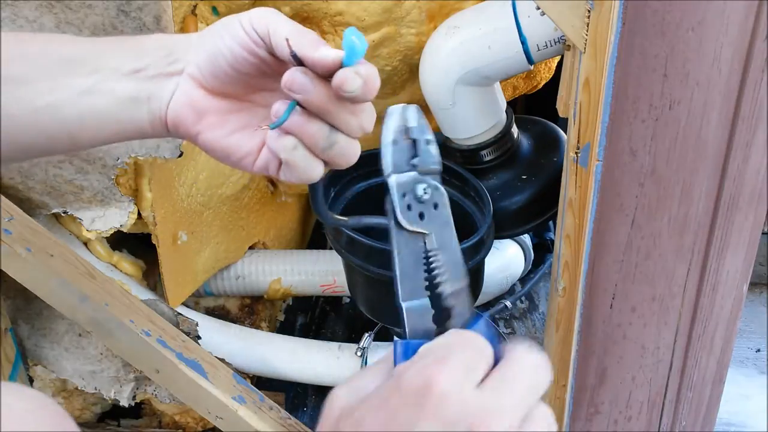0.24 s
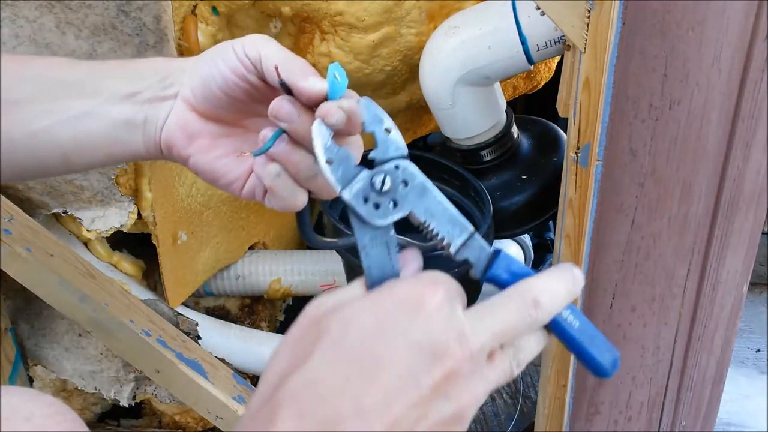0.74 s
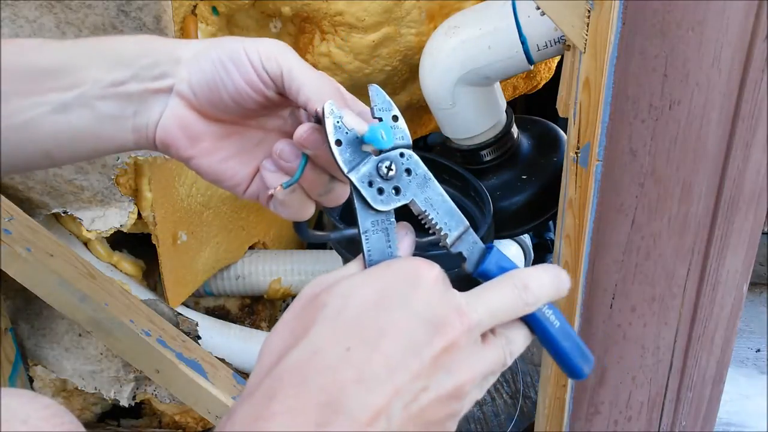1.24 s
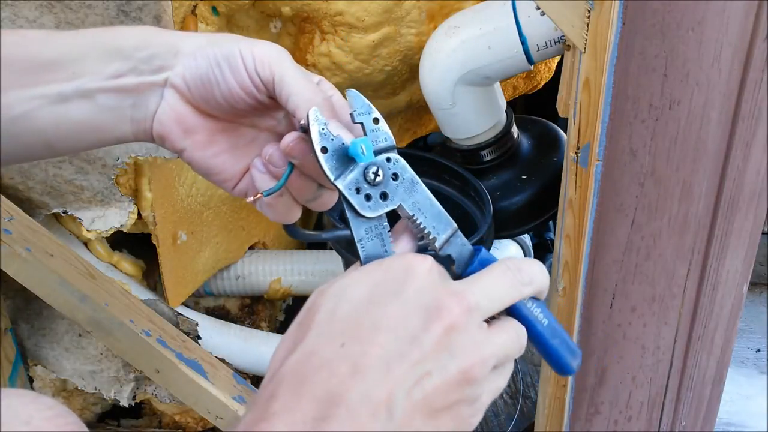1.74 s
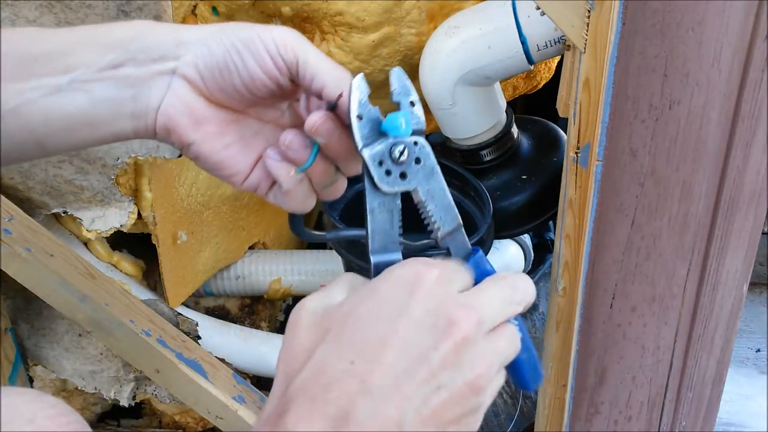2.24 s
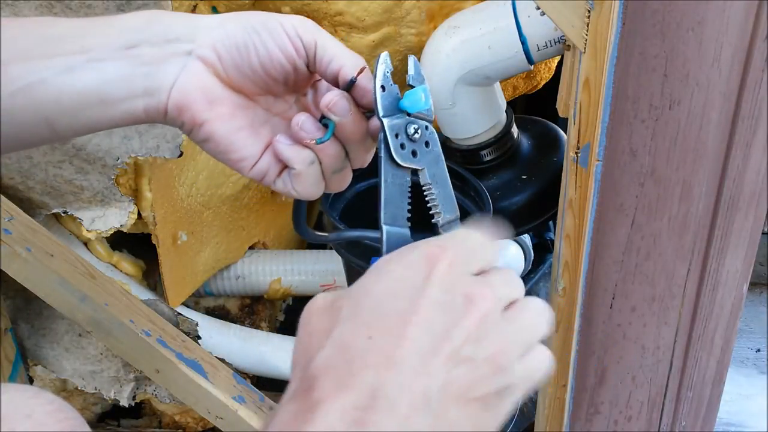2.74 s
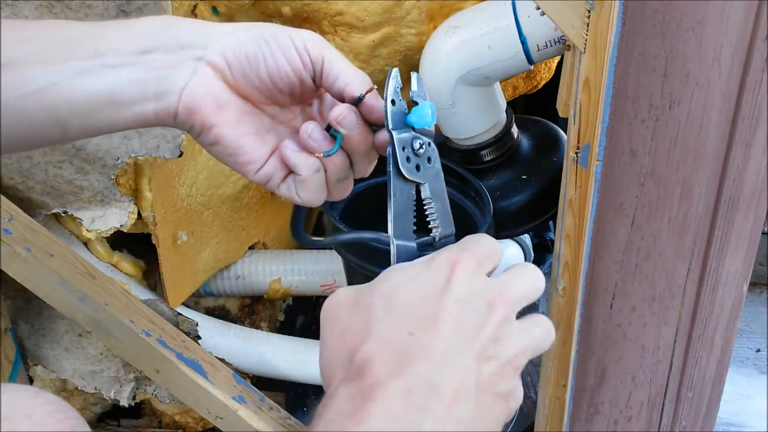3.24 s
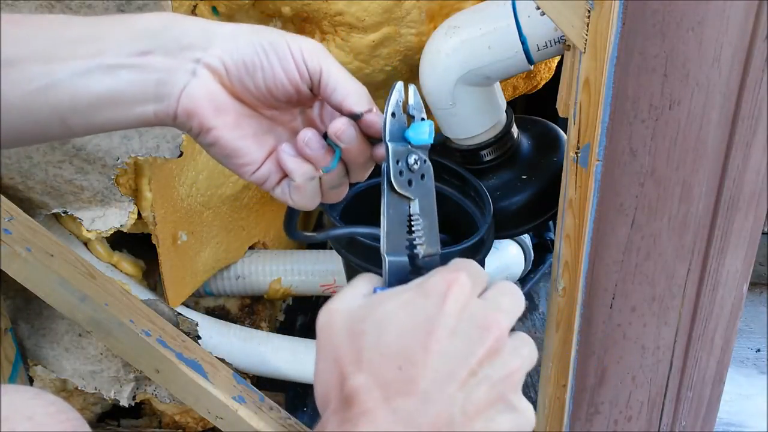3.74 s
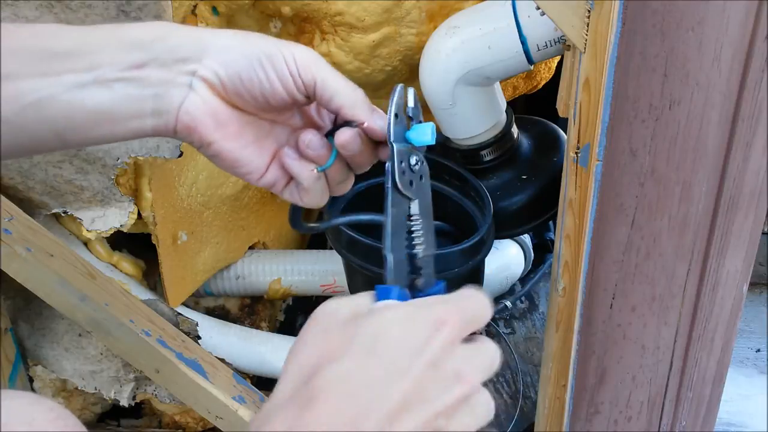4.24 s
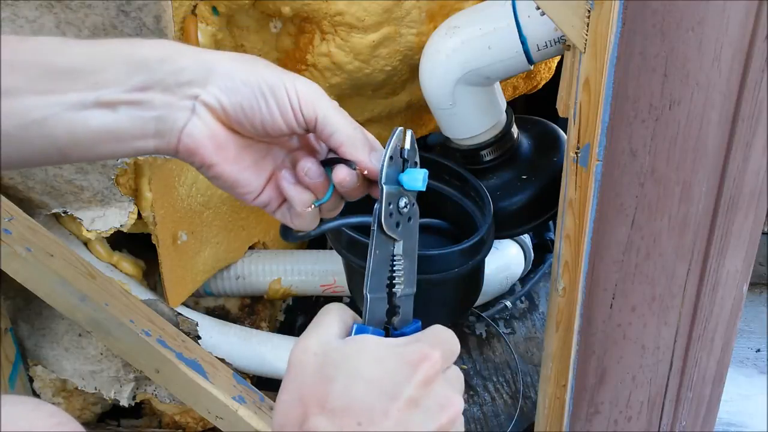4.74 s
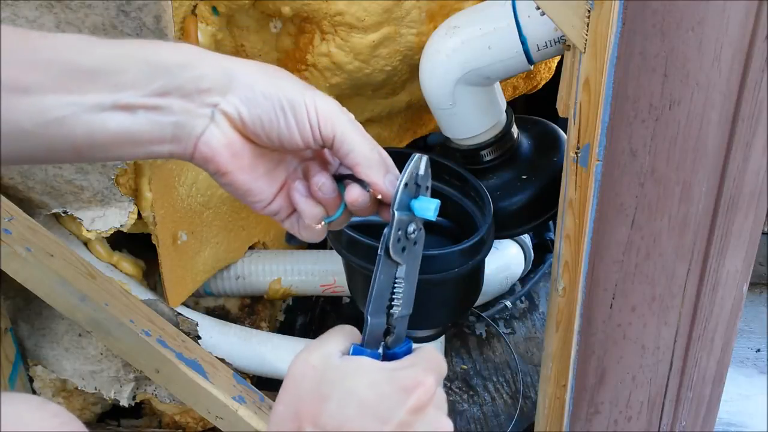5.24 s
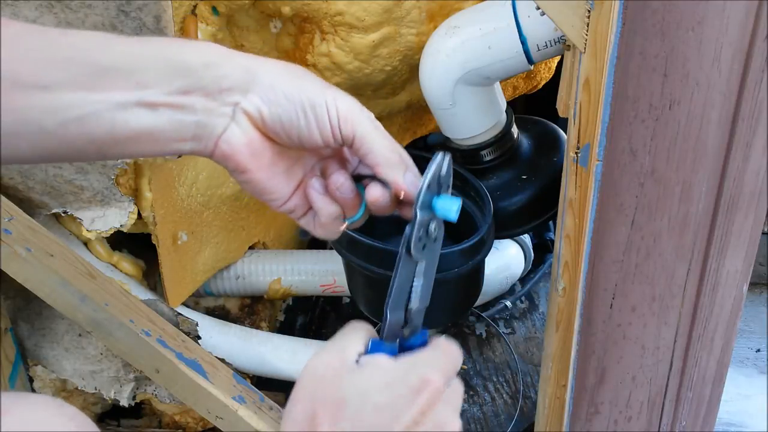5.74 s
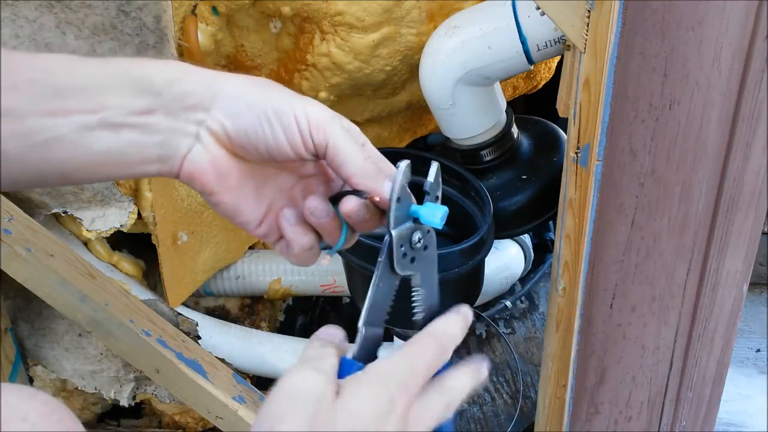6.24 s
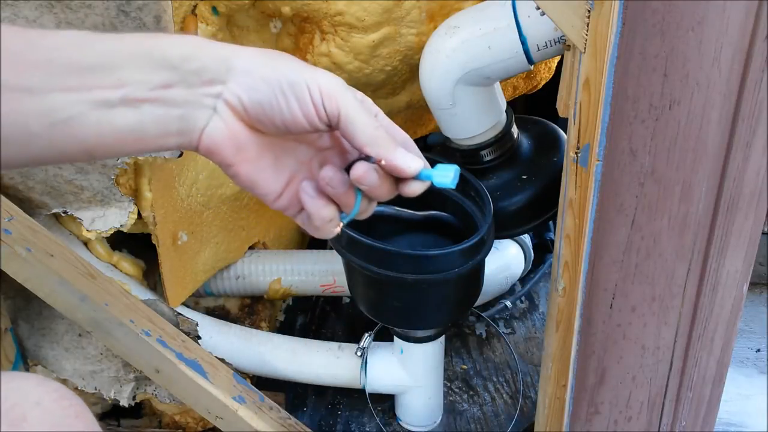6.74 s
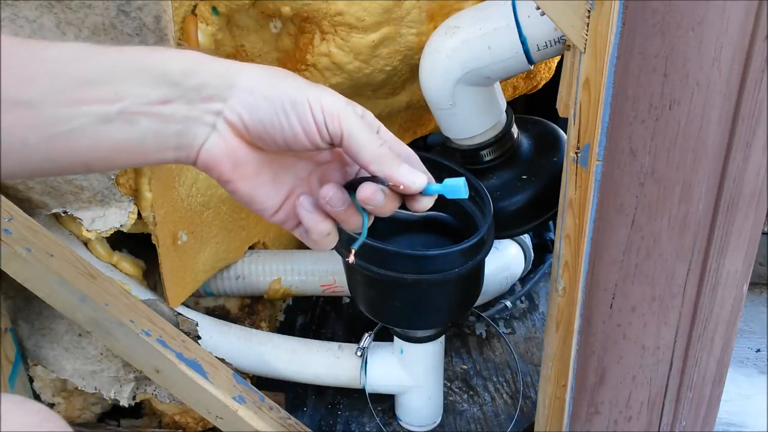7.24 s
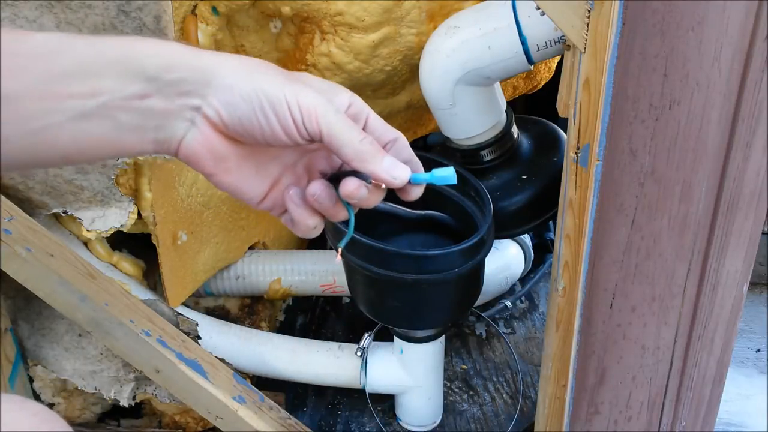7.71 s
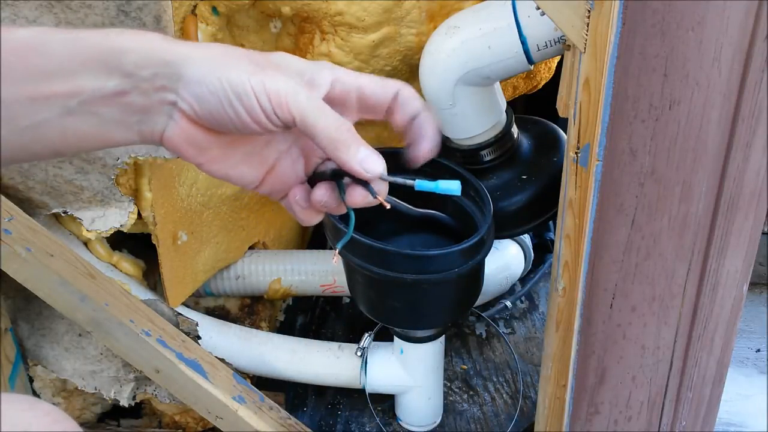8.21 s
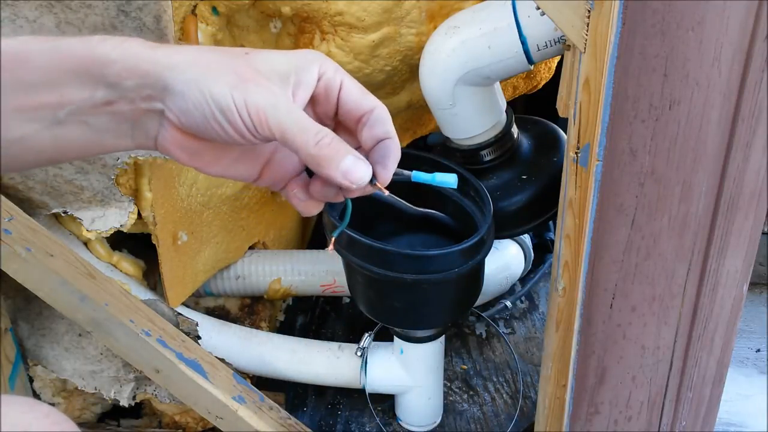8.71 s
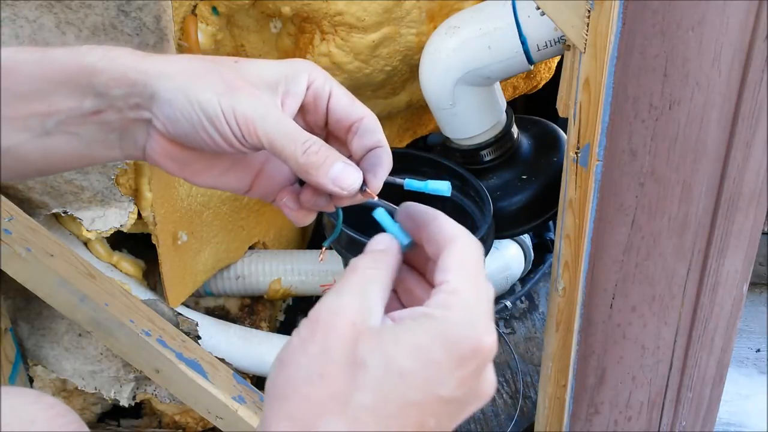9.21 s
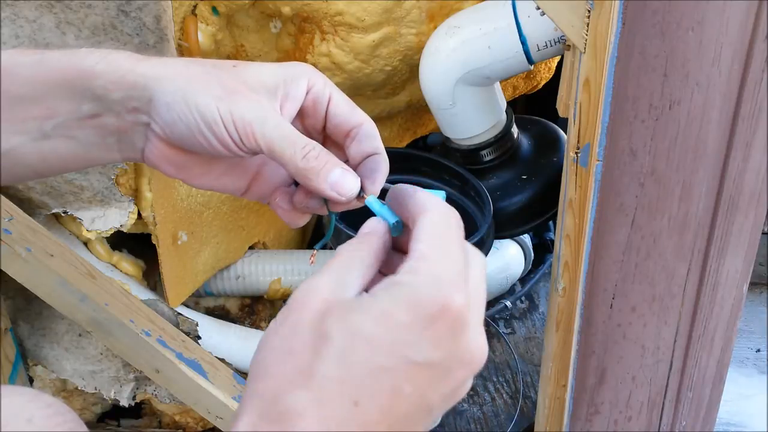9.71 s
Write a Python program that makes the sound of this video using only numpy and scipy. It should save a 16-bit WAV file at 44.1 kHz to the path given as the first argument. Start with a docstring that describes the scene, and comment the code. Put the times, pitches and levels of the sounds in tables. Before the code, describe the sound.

Dry, crisp metal ticks and soft finger rubs sit close to the microphone, while an idling engine rumbles unevenly some way off, strongest early and fading later. A short bird whistle comes just before a connector's clean plastic snap. After a pause the tool's jaws spring open loudly, a sleeve brushes, the jaws clap and the tool rattles down. Light wire slides and flicks follow.

```python
"""Outdoors, an engine idles some way off (shaft orders over rumble) with its fan humming (blade tones), under hiss.
Close by, just right of a stereo microphone, fingers and a sleeve rub (shaped noise) and steel jaws tick.
A distant bird whistles a short phrase (gliding sines), then a plastic connector gives way in the crimping tool.
The tool springs open, claps shut and is laid down with a clatter (noise bursts through resonances of the parts).
Last, fingers slide along the wire and flick it."""
import sys
import numpy as np
from scipy.fft import rfft, irfft, next_fast_len
from scipy.io import wavfile
from scipy.ndimage import map_coordinates

SR = 44100
rng = np.random.default_rng(int(sys.argv[2]) if len(sys.argv) > 2 else 0)


def wav_record(signal):
    """Record a signal, one row per channel, as 16-bit PCM in the file named by sys.argv[1]."""
    frames = np.transpose(np.atleast_2d(signal))
    bounded = np.clip(frames, -1, 1)
    # unit amplitude maps onto the largest positive 16-bit level
    quanta = np.round(bounded * 32767).astype(np.int16)
    wavfile.write(sys.argv[1], SR, quanta)


N = 439677  # length [samples]
SIDES = np.array([[.5], [-.5]])  # shares a left-right difference: positive is louder on the left
TOP_HZ = 14650  # upper band limit of the microphone

# All levels in the tables are relative.
# hiss of the place: (frequency [Hz], level [dB])
AIR_SPECTRUM = [(100, 8.5), (600, 5), (1500, 5), (3500, 3), (5500, 2), (8000, 1.5), (9600, 1), (11500, 1),
                (14500, 1)]
AIR_DB, AIR_FADE_DB_PER_S = -59, 0.71  # the hiss slowly ebbs
# likeness of distant noise at the two ports: (frequency [Hz], correlation [-1 to 1])
PORT_LIKENESS = [(60, 0.65), (130, 0.83), (250, 0.54), (500, 0.37), (1000, 0), (4000, 0)]

# speed of the idling shaft: (time [s], speed [turns/s])
SHAFT_SPEED = [(0, 20.2), (1.3, 19.9), (3, 19.3), (5, 19.1), (7.5, 19.55), (9.97, 19)]
# exhaust tones: (multiple of the shaft rate [order], level [dB])
EXHAUST_ORDERS = [(2, -28.5), (4, -13), (5, 0.5), (6, -11.5), (7, -12.5), (8, -16), (9, -29.5), (10, -32),
                  (11, -39.5), (12, -31), (13, -41), (15, -30.5), (17, -34)]
# how loudly the engine's drone carries: (time [s], level [dB])
DRONE_LEVEL = [(0, -50.5), (0.25, -44.5), (1.1, -41), (2.9, -45.5), (3.6, -55.5), (4.36, -55.5),
               (4.8, -48.5), (5.6, -57.5), (6.1, -54), (7, -50), (8.5, -57), (8.9, -56), (9.97, -60.5)]
# low boom at three times the shaft rate: (time [s], level [dB])
BOOM_LEVEL = [(0, -64), (1.6, -59), (2.9, -50.5), (3.6, -61), (4.4, -59.5), (6, -65), (9.97, -67)]
# octave of the drone: (time [s], level [dB])
OCTAVE_LEVEL = [(0, -69), (1.4, -71), (3, -77), (6.5, -75.5), (8.5, -69), (9.1, -63), (9.97, -72)]
# engine rumble: (frequency [Hz], level [dB])
RUMBLE_SPECTRUM = [(20, -16.5), (40, -4.5), (65, -6), (90, 12), (130, 7.5), (190, -0.5), (260, -1),
                   (370, -2.5), (480, -6.5), (620, -9), (760, -12.5), (1100, -14), (1600, -25), (3000, -32),
                   (8000, -47.5)]
USUAL_DRONE_DB, RUMBLE_FOLLOWS = -52, .5  # dB of rumble for each dB of drone above the usual

FAN_HZ = 74.02  # base rate of the fan tones
# how loudly the fan carries: (time [s], level [dB])
FAN_LEVEL = [(0, -64.5), (2, -57.5), (2.8, -58), (3.9, -75.5), (4.5, -71), (7.3, -70), (8.2, -86),
             (8.8, -70), (9.4, -68.5), (9.97, -74)]
# blade tones: (multiple of FAN_HZ [order], level [dB])
BLADE_ORDERS = [(4, -20.5), (5, -2.5), (6, -8), (7, 0), (8, -11), (9, -15.5), (10, -23.5), (14, -21.5)]

# whistled notes: (time [s], length [s], start [Hz], middle [Hz], end [Hz], level [dB])
BIRD_NOTES = [(2.96, .07, 2950, 3080, 3050, -78), (3.205, .095, 3080, 3120, 2880, -69),
              (3.295, .215, 4220, 4090, 3930, -70), (3.5, .08, 4350, 4370, 4200, -75),
              (3.6, .035, 4170, 4150, 4120, -76)]

# colour of nearby sounds at each microphone port: (frequency [Hz], level [dB])
LEFT_PORT = [(400.0, -27.5), (900.0, -23.5), (1600.0, -21.5), (2400.0, -21), (3700.0, -12.5),
             (5000.0, -18.5), (6300.0, -23), (7500.0, -26), (9600.0, -35), (11300.0, -33), (13000.0, -30.5),
             (14400.0, -33.5)]
RIGHT_PORT = [(400.0, -21.5), (900.0, -25.5), (1600.0, -21.5), (2400.0, -25), (3700.0, -20.5),
              (5000.0, -14.5), (6300.0, -12), (7500.0, -7.5), (9600.0, 1), (11300.0, -6), (13000.0, -9.5),
              (14400.0, -12.5)]

# fine brushing of the sleeve: (frequency [Hz], level [dB])
CLOTH_SPECTRUM = [(300, 2), (900, 6.5), (1300, 4.5), (1650, 8.5), (2100, 8.5), (3100, 9), (5000, 0),
                  (7000, -3), (9500, -1), (14000, -2)]
# low flutter of the sleeve: (frequency [Hz], level [dB])
FLAP_SPECTRUM = [(60, -15.5), (180, -2), (320, 0), (600, -9), (1200, -19), (4000, -51)]
# sweeps of the arm: (time of peak [s], rise [s], fall [s], level [dB]); rise and fall each span SWEEP_DEPTH_DB
SWEEPS = [(6.9, .4, 0.18, -31.5), (7.08, 0.13, 0.056, -39), (7.19, 0.082, 0.065, -41),
          (8.46, 0.83, .6, -48.5)]
SWEEP_DEPTH_DB = 20
STIR_DB, STIR_FADE_DB_PER_S = -55, 1.0  # cloth stirs faintly between sweeps, less and less
# flutter under a loud brush; dB of flutter for each dB of brushing
FLAP_DB, LOUD_BRUSH_DB, FLAP_FOLLOWS = -57.5, -33, 0.53
# soft bumps of the arm: (time [s], frequency [Hz], level [dB])
ARM_BUMPS = [(4.29, 85, -40), (7.165, 288, -50), (7.637, 160, -46.5), (7.862, 189, -45.5)]

# resonances, one list for each kind of contact in the order named below: (frequency [Hz], width [Hz], level [dB])
STRUCK_PARTS = [
    [(537, 120, 20), (970, 270, 15), (2260, 1200, 14.6), (3320, 320, 6.6)],
    [(1420, 680, 9.7), (1900, 580, 8.9), (2680, 335, 4.3), (3980, 720, 3.4)],
    [(486, 260, 4.2), (3070, 450, 6.6), (3790, 700, 9.6), (7650, 740, 4)],
    [(4180, 900, 6.2), (5800, 630, 4.3), (6370, 1300, 6.7), (13760, 1800, 3.2)],
    [(1490, 260, 16), (1880, 180, 11), (2580, 500, 7.7), (6110, 720, 13.6)],
    [(5800, 600, 13), (6570, 790, 19.7), (7140, 400, 11), (9400, 700, 3.4)],
]
# connector giving way, jaws and pivot, whole tool on the ground, wire and fingers, jaws clapping, insulation
PLASTIC, JAWS, TOOL, FINGERS, CLAP, SLIDE = range(6)

# fingers rub wire and tool: (time [s], length [s], level [dB], brightness [dB], left-right [dB])
FINGER_RUBS = [(0.192, .11, -52, 11, 6), (0.458, .15, -43.5, 5, 5), (2.331, .13, -49.5, 2.5, 5),
               (2.831, .042, -46, 2, 11), (4.227, .055, -52.5, 5, 4), (4.376, 0.074, -58, 13.5, 0),
               (5.846, .081, -48.5, 4.5, 6), (6.003, .045, -48, 9.5, 1), (7.858, 0.023, -44, 2.5, 4),
               (7.949, 0.0115, -41.5, 18, 8), (7.966, .012, -55, 14, 6), (8, .02, -40.5, 25, 6.5),
               (8.021, 0.017, -33.5, 14.5, -2), (8.034, .016, -28.5, 6, -13.5), (8.062, 0.018, -30, 7, 8),
               (8.077, .011, -24, 0.5, -10.5)]
# a firm rub, its knock; dB of knock lost for each dB above it
FIRM_RUB_DB, RUB_KNOCK_DB, RUB_THINNING = -44, 1.5, 0.46
# connector scuffs in the jaws: (time [s], length [s], level [dB])
CONNECTOR_SCUFFS = [(5.5, 0.12, -59), (5.687, 0.075, -52.5)]
SCUFF_KNOCK_DB, SCUFF_BRIGHT_DB = 9.5, -16
# fingers slide along the insulation: (time [s], length [s], level [dB], brightness [dB], left-right [dB])
INSULATION_SLIDES = [(8.58, 0.066, -45.5, 0, -7.5), (8.914, 0.07, -45.5, 10, 3),
                     (8.959, 0.0077, -39.5, 0.5, -13)]
SLIDE_KNOCK_DB = 0.5
# tool settles on the ground, one row: (time [s], length [s], level [dB], knock [dB], brightness [dB], left-right [dB])
TOOL_SETTLE = (8, 1.8, -49, 4, -14, 10)

# jaws and pivot tick, then spring open: (time [s], level [dB], brightness [dB], left-right [dB])
JAW_TICKS = [(0.571, -21, -13.5, 5), (0.987, -28, -23, -2), (1.218, -27, -21, -4), (1.362, -39, -7, 0),
             (1.407, -24.5, -24, -3), (2.07, -43.5, 2, 7), (2.423, -30, -9, 1), (3.444, -37, -4, -2),
             (3.878, -38.5, -9, -1), (4.186, -49, -0.5, -5), (4.505, -48.5, 4, 2), (5.044, -38, 0, 2),
             (5.81, -43, -14, 2), (5.893, -40.5, 5.5, 3.5), (6.0555, -20, -9.5, .5), (6.1615, -7.5, -16, 6),
             (6.1653, -6, -14.5, .5), (6.465, -40.5, 1.5, -1), (6.484, -22.5, -19.5, 2)]
TICK_KNOCK_DB, FIRM_TICK_DB, TICK_THINNING = -7.5, -36, .25  # knock of a firm tick; dB lost for each dB above it
# connector gives way: (time [s], level [dB], brightness [dB])
CONNECTOR_SNAPS = [(3.7325, -40, -14), (3.7569, -25.5, -31), (4.571, -46, -19)]
# jaws clap shut: (time [s], level [dB], brightness [dB], left-right [dB])
JAW_CLAPS = [(6.8475, -1, -11.5, -3), (6.8627, -2.5, -9.5, 0.5)]
SNAP_KNOCK_DB, CLAP_KNOCK_DB = 9.5, -16
# tool is laid down and bounces: (time [s], level [dB], knock [dB], brightness [dB], left-right [dB])
TOOL_JOLTS = [(7.4139, -5.5, -6, -7.5, -.5), (7.4202, -12.5, -3, 0, 6), (7.479, -6, -3, 1, 1),
              (7.4863, -10, -2.5, -.5, 1.5), (7.495, -21.5, 4.5, 6, -5), (7.496, -9.5, -9, 0, -5),
              (7.501, -16, 3, 4, -2), (7.506, -14, 1.5, 5, 6.5), (7.519, -16, -7.5, 3, 1),
              (7.5421, -17.5, -3.5, 0, -1.5), (7.5544, -24, -10, 6, 13), (7.5746, -21.5, 11.5, 13.5, -2.5),
              (7.591, -27, 8, 10, 5), (7.631, -43, 11, 8, -9), (7.642, -35, 11, 5, -2),
              (7.647, -24, -13, 7.5, 1.5), (7.6658, -26, 8.5, 4, -3), (7.6877, -33, -4.5, 7, 3),
              (7.7, -39, -4, 6, 1), (7.71, -40, -8, 4, -9)]
# wire flicks off a fingertip: (time [s], level [dB], left-right [dB])
WIRE_FLICKS = [(8.1497, -42, -3), (8.199, -39.5, -3), (8.288, -43, -10), (8.464, -20, 5.5),
               (9.195, -51, -3)]
FLICK_KNOCK_DB, FLICK_BRIGHT_DB = -6, 4.5


def amp(db):
    """Decibels to gain."""
    return 10 ** (np.asarray(db) / 20)


def unit(x):
    """Scale to rms 1."""
    return x / np.sqrt(np.mean(x ** 2) + 1e-20)


def along(points, hz):
    """Read (Hz, value) points on a log frequency axis."""
    f, v = np.transpose(points)
    return np.interp(np.log(hz + 1), np.log(f + 1), v)


def curve(points):
    """One value per sample from (time, value) points."""
    return np.interp(np.arange(N) / SR, *np.transpose(points))


def wobble(rate):
    """A smooth random curve, rate knots a second."""
    knots = rng.standard_normal(int(N * rate / SR) + 4)
    return map_coordinates(knots, [np.arange(N) * rate / SR], order=2)


def uneven(t, rate, depth_db):
    """A jagged random gain of rms 1, rate knots a second."""
    return unit(amp(depth_db * np.interp(t * rate, np.arange(512), rng.standard_normal(512))))


def filtered(x, response):
    """x times a response of frequency."""
    m = next_fast_len(N + 8192)
    return irfft(rfft(x, m) * response(np.fft.rfftfreq(m, 1 / SR)), m)[..., :N]


def add(track, s, sound):
    """Mix a stereo sound in at time s."""
    start = round(s * SR)
    part = track[:, start:start + sound.shape[1]]
    part += sound[:, :part.shape[1]]


def rush(spectrum):
    """Outdoor stereo noise of rms 1, alike in the bass and unrelated in the treble."""
    def mid_side(hz):
        turn = np.arccos(np.clip(along(PORT_LIKENESS, hz), -1, 1)) / 2
        return amp(along(spectrum, hz)) * [np.cos(turn), np.sin(turn)]

    mid, side = filtered(rng.standard_normal((2, N)), mid_side)
    return unit(np.array([mid + side, mid - side]))


def scatter(count, own=0.98):
    """Stereo noise of rms 1: a part shared by the two ports plus each port's own."""
    return unit(rng.standard_normal(count) + own * rng.standard_normal((2, count)))


def ports(hz):
    """Left and right port colour in dB."""
    return np.array([along(LEFT_PORT, hz), along(RIGHT_PORT, hz)])


def coloured(force, kind, knock_db, bright_db, pan_db, size=16384):
    """A contact force through the struck part and the ports: knock lifts the lows, brightness the treble."""
    hz = np.fft.rfftfreq(size, 1 / SR)
    peaks = 0
    for centre, width, db in STRUCK_PARTS[kind]:
        peaks = peaks + (amp(db) ** 2 - 1) / (1 + ((hz - centre) / (width / 2)) ** 2) ** 2
    tilt = along([(1200, knock_db), (3700, 0), (9600, bright_db)], hz)
    bass_cut = along([(60, -16.5), (350, 0)], hz)
    gain = amp(ports(hz) + tilt + SIDES * pan_db + bass_cut) * np.sqrt(np.abs(1 + peaks))
    # minimum phase: the body rings only after the blow
    cepstrum = irfft(np.log(gain))
    fold = np.r_[1, np.full(size // 2 - 1, 2), 1, np.zeros(size // 2 - 1)]
    return irfft(rfft(force, size) * np.exp(rfft(cepstrum * fold)))


def air():
    """A faint hiss, steady but slowly ebbing, lies under everything."""
    return amp(AIR_DB - AIR_FADE_DB_PER_S * np.arange(N) / SR) * rush(AIR_SPECTRUM)


def engine(drone_db=-1.0, boom_db=-2, rumble_db=-56.5):
    """Exhaust orders of a slow, slightly uneven shaft over a rumble that follows the drone and throbs each turn."""
    drone = curve(DRONE_LEVEL)
    angle = 2 * np.pi * np.cumsum(curve(SHAFT_SPEED)) / SR + .03 * wobble(5)

    def order(k):
        phase = .12 * wobble(4) + rng.uniform(0, 2 * np.pi)
        return np.sqrt(2) * amp(.7 * wobble(6)) * np.sin(round(k) * angle + phase)

    exhaust = amp(drone + drone_db) * sum(amp(db) * order(k) for k, db in EXHAUST_ORDERS)
    # the low boom and the octave of the drone swell independently of it
    boom = amp(curve(BOOM_LEVEL) + boom_db) * order(3)
    octave = amp(curve(OCTAVE_LEVEL)) * order(10)
    rumble_level = rumble_db + RUMBLE_FOLLOWS * (drone - USUAL_DRONE_DB)
    throb = 1 + 0.14 * np.sin(angle)
    return exhaust + boom + octave + amp(rumble_level) * rush(RUMBLE_SPECTRUM) * throb


def fan(flutter_db=2, unsteady_rad=0.33, pan_db=-3.5, spread_rad=1.0):
    """Blade tones waver on their way through the air and reach the two ports out of step."""
    angle = 2 * np.pi * FAN_HZ * np.arange(N) / SR
    tones = np.zeros((2, N))
    for k, level in BLADE_ORDERS:
        gain = amp(level + flutter_db * wobble(6))
        phase = unsteady_rad * wobble(5) + spread_rad * SIDES + rng.uniform(0, 2 * np.pi)
        tones += gain * np.sin(round(k) * angle + phase)
    return np.sqrt(2) * amp(curve(FAN_LEVEL) + pan_db * SIDES) * tones


def bird(quaver_hz=40, flutter_db=2.5, pan_db=4):
    """A far bird slides through a few soft, fluttering whistles: sines on curved pitch glides."""
    out = np.zeros((2, N))
    quaver = quaver_hz * wobble(200)
    for s, length, start_hz, middle_hz, end_hz, db in BIRD_NOTES:
        u = np.linspace(0, 1, round(length * SR))
        glide = np.polyval(np.polyfit([0, .5, 1], [start_hz, middle_hz, end_hz], 2), u)
        hz = glide + quaver[round(s * SR):][:len(u)]
        swell = np.sqrt(2 * np.abs(np.sin(np.pi * u)))
        note = swell * np.sin(2 * np.pi * np.cumsum(hz) / SR)
        add(out, s, amp(db + SIDES * pan_db) * note)
    return out * amp(flutter_db * wobble(70))


def sleeve(grain_db=2.0, level_db=1, uneven_db=1.6):
    """Cloth brushes along with a fine grain and a low flutter, swelling and dying with each sweep of the arm."""
    t = np.arange(N) / SR
    sweeps = [db - SWEEP_DEPTH_DB * np.maximum((s - t) / rise, (t - s) / fall) for s, rise, fall, db in SWEEPS]
    db = np.max([STIR_DB - STIR_FADE_DB_PER_S * t, *sweeps], axis=0)
    flutter = amp(FLAP_DB + FLAP_FOLLOWS * (db - LOUD_BRUSH_DB)) * rush(FLAP_SPECTRUM)
    brush = filtered(scatter(N, own=1.5), lambda hz: amp(ports(hz) + along(CLOTH_SPECTRUM, hz)))
    grain = grain_db * wobble(250) + uneven_db * wobble(25)
    return brush * amp(db + level_db + grain) + flutter


def bumps(rise_s=0.005):
    """Each soft bump of the arm is a low sine that swells and dies within a few cycles."""
    out, t = np.zeros((2, N)), np.arange(SR // 8) / SR
    for s, hz, db in ARM_BUMPS:
        swell = t / rise_s * np.exp(1 - t / rise_s)
        add(out, s, amp(db) * swell * np.sin(2 * np.pi * hz * t) * np.ones((2, 1)))
    return out


def strokes():
    """Every stroke as (rubbed part, s, length, level, knock, brightness, left-right); harder rubs sound thinner."""
    rows = [(TOOL, *TOOL_SETTLE)]
    for s, length, db, bright, pan in FINGER_RUBS:
        knock = RUB_KNOCK_DB - RUB_THINNING * (db - FIRM_RUB_DB)
        rows.append((FINGERS, s, length, db, knock, bright, pan))
    for s, length, db, bright, pan in INSULATION_SLIDES:
        rows.append((SLIDE, s, length, db, SLIDE_KNOCK_DB, bright, pan))
    for s, length, db in CONNECTOR_SCUFFS:
        rows.append((PLASTIC, s, length, db, SCUFF_KNOCK_DB, SCUFF_BRIGHT_DB, 0))
    return rows


def rubs(slip_hz=700, tail_db=-20, tail_t60=0.11):
    """Each stroke is a swell of tiny uneven slips, as surfaces catch and let go, with a short tail."""
    out, t = np.zeros((2, N)), np.arange(SR // 4) / SR
    for kind, s, length, db, knock_db, bright_db, pan_db in strokes():
        swell = np.sqrt(np.abs(np.sin(np.pi * np.clip(t / length, 0, 1) ** 1.25)))
        tail = (t > length / 2) * amp(tail_db - 60 * np.maximum(t - length, 0) / tail_t60)
        force = (swell * uneven(t, slip_hz, 3.5) + tail) * scatter(len(t))
        add(out, s, coloured(amp(db) * force, kind, knock_db, bright_db, pan_db))
    return out


def skitter(level_db=-15, bright_db=-1, grain_db=4, start_s=7.482, length_s=0.11):
    """The landing tool skids over grit between its bounces: a fading burst of grainy noise."""
    out, t = np.zeros((2, N)), np.arange(SR // 5) / SR
    fade = np.clip(1 - t / length_s, 0, 1) ** 2
    force = fade * uneven(t, 1200, grain_db) * scatter(len(t))
    add(out, start_s, coloured(amp(level_db) * force, TOOL, 0, bright_db, 0))
    return out


def contacts():
    """Every contact as (s, struck part, level, knock, brightness, left-right); harder ticks knock relatively less."""
    rows = [(s, PLASTIC, db, SNAP_KNOCK_DB, bright, 0) for s, db, bright in CONNECTOR_SNAPS]
    for s, db, bright, pan in JAW_TICKS:
        knock = TICK_KNOCK_DB - TICK_THINNING * (db - FIRM_TICK_DB)
        rows.append((s, JAWS, db, knock, bright, pan))
    rows += [(s, CLAP, db, CLAP_KNOCK_DB, bright, pan) for s, db, bright, pan in JAW_CLAPS]
    rows += [(s, TOOL, *blow) for s, *blow in TOOL_JOLTS]
    rows += [(s, FINGERS, db, FLICK_KNOCK_DB, FLICK_BRIGHT_DB, pan) for s, db, pan in WIRE_FLICKS]
    return rows


def clicks(echo_db=-5, spike=3, tail_db=-19.5, tail_t60=0.12, chatter_db=1.5):
    """Each contact: a spike, a chattering crack, an echo off the nearest surface and a short tail."""
    out, t = np.zeros((2, N)), np.arange(SR // 3) / SR
    echo_s, t60 = .0028, .017
    crack = amp(-60 * t / t60)
    echo = (t > echo_s) * amp(echo_db - 60 * np.abs(t - echo_s) / t60)
    tail = amp(tail_db - 60 * t / tail_t60)
    shape = np.sqrt(crack ** 2 + echo ** 2 + tail ** 2)
    for s, kind, db, knock_db, bright_db, pan_db in contacts():
        force = shape * uneven(t, 900, chatter_db) * scatter(len(t))
        force[:, 0] = spike
        if kind == PLASTIC:  # plastic yields in one clean step, which comes straight back as an echo
            force[:, [0, round(echo_s * SR)]] += [12, 8]
        # equal energy for every contact, so the table alone sets the level
        force *= np.sqrt(SR / 100 / np.sum(force ** 2, axis=1, keepdims=True))
        add(out, s, coloured(amp(db) * force, kind, knock_db, bright_db, pan_db))
    return out


def scene():
    """Engine and bird some way off, handwork close by."""
    distant = air() + engine() + fan() + bird()
    arm = sleeve() + bumps()
    return distant + arm + rubs() + skitter() + clicks()


def record(dry):
    """The microphone's electronics round off the highest peaks and cut steeply above the band limit."""
    rounded = dry / (1 + np.abs(dry / .85) ** 6) ** (1 / 6)
    return filtered(rounded, lambda hz: 1 / np.sqrt(1 + (hz / TOP_HZ) ** 200))


dry = scene()
out = record(dry)
wav_record(out)
```